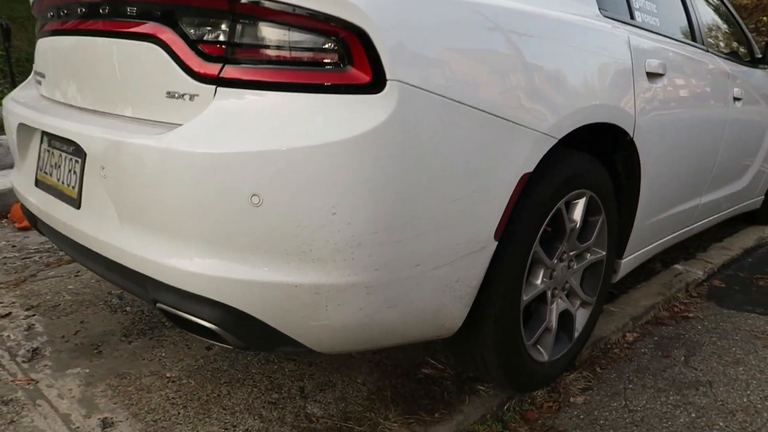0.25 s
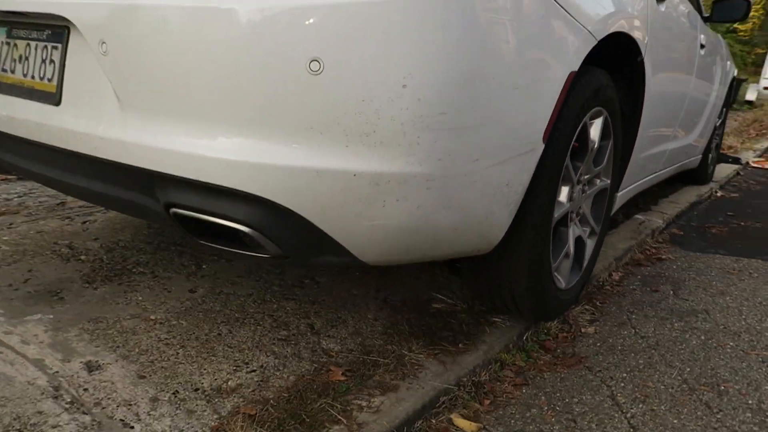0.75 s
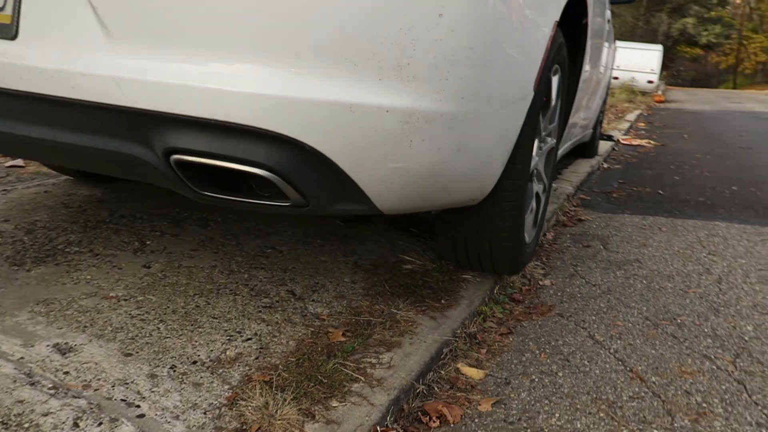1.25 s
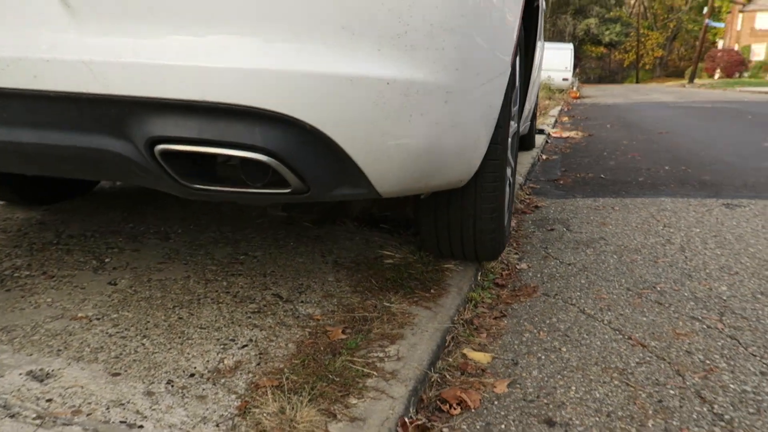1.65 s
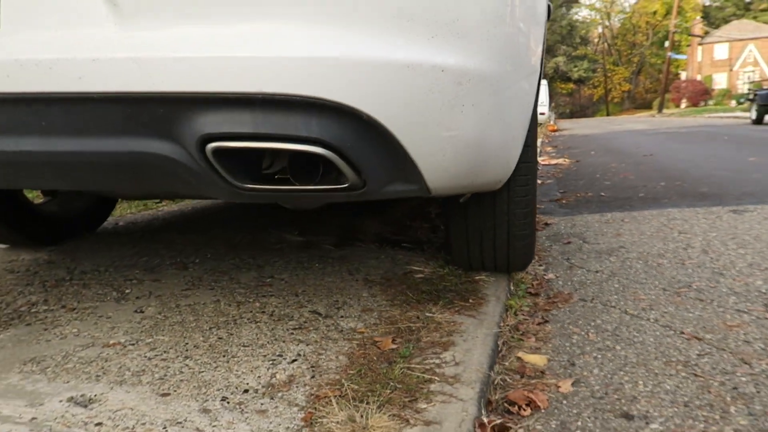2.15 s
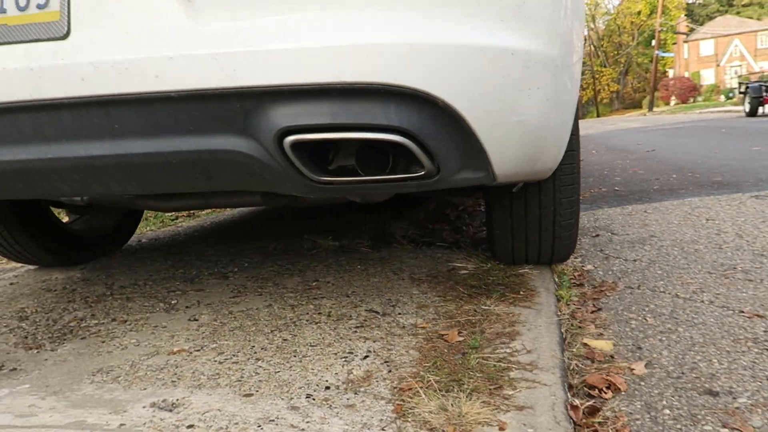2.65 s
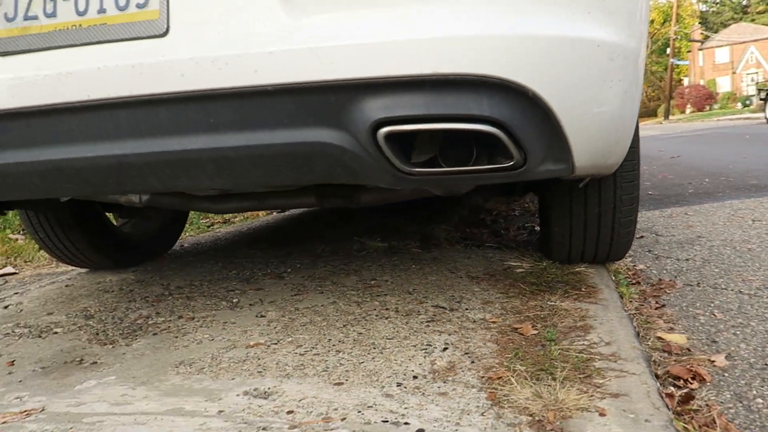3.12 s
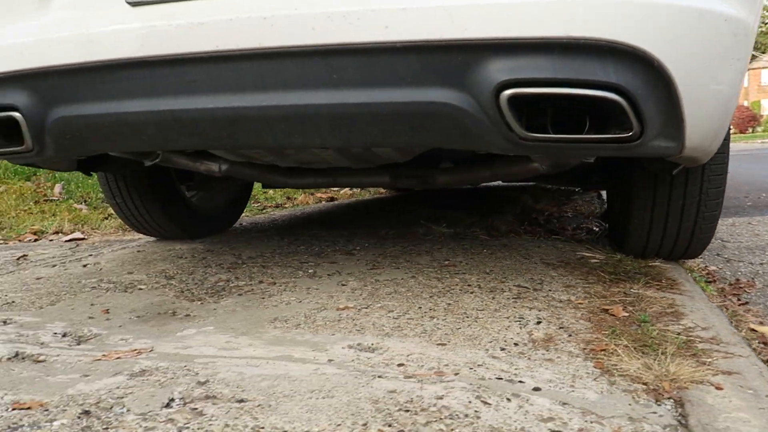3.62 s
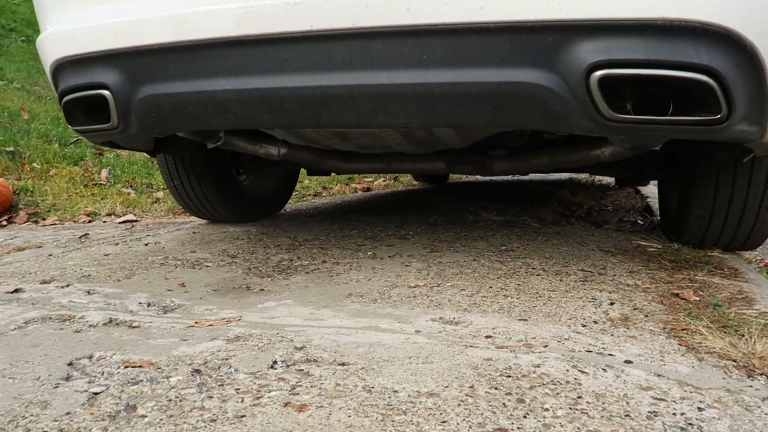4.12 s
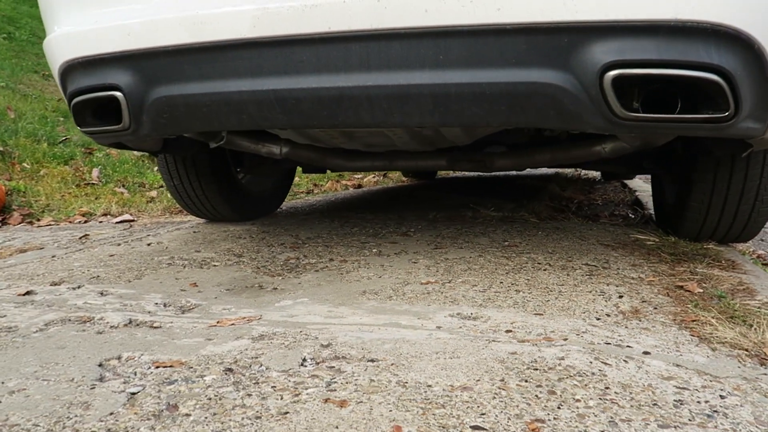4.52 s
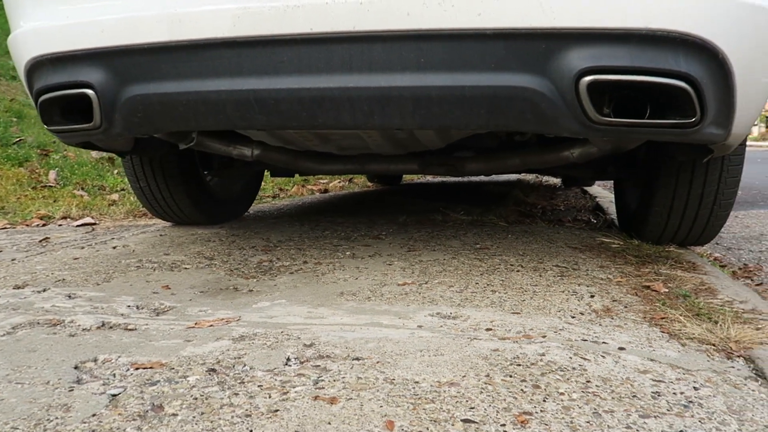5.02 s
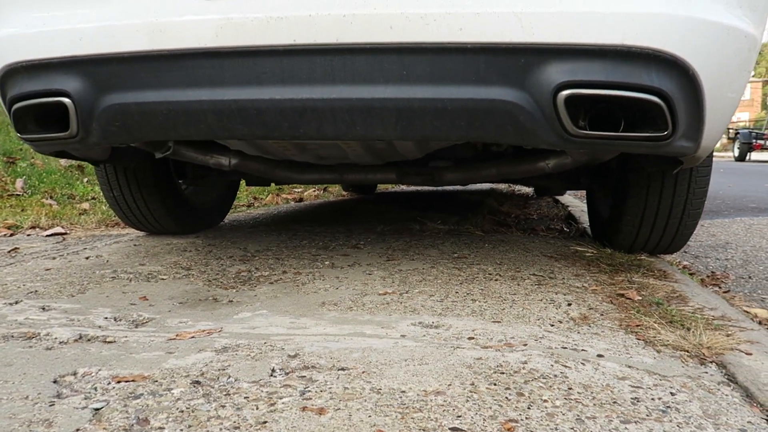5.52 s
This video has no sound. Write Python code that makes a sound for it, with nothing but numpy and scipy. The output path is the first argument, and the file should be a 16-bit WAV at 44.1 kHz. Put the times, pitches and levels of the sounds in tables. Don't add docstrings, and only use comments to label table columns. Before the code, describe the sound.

Close outdoor exhaust sound: throaty revs swell and sink over a rumbling drone, with gassy roar, hiss and faint handling noise.

```python
import sys
import numpy as np
from scipy import signal
from scipy.fft import rfft, irfft
from scipy.io import wavfile
from scipy.ndimage import uniform_filter1d

SR = 44100
rng = np.random.default_rng(int(sys.argv[2]) if len(sys.argv) > 2 else 0)


def ratio_of_db(decibels):
    return 10 ** (np.asarray(decibels, float) / 20)


def generate_wav(signal):
    frames = np.transpose(np.atleast_2d(signal))
    scaled = np.clip(frames, -1, 1) * 32767
    pcm = np.round(scaled).astype(np.int16)
    wavfile.write(sys.argv[1], SR, pcm)


N = 254456
T = np.arange(N) / SR

# f/Hz, density/dB
AIR_COLOUR = [(12, -29.5), (20, -7.5), (28, -4.5), (38, -9), (48, 1.5), (60, -10.5), (90, -38.5),
              (200, -100)]
# t/s, length/s, level/dB
GUSTS = [(.5, 0.098, -46), (1.28, 0.024, -44), (2.3, 0.26, -39.5), (2.86, 0.069, -46), (4.35, 0.1, -46),
         (5.75, 0.037, -32)]
# t/s, length/s, level/dB
SCUFFS = [
    (.84, 0.025, -66),
    (1.3, 0.057, -55.5),
    (4.19, 0.024, -70.5),
    (4.43, 0.039, -55.5),
]
# t/s, length/s, level/dB
TICKS = [
    (.004, .005, -53),
    (4.19, .02, -80),
]
# f/Hz, level/dB
HUMS = [(1061, -64.5), (1152, -70), (2379, -77), (3241, -78.5), (3515, -77), (4285, -81.5), (4635, -84.5),
        (5367, -80.5)]
# start/s, end/s, start f/Hz, end f/Hz, level/dB
WHISTLES = [(.36, .45, 815, 850, -45), (.33, .44, 1110, 1130, -55), (1.76, 1.88, 1290, 1270, -55),
            (1.4, 1.5, 990, 980, -54), (2.28, 2.48, 1160, 1140, -54), (3.45, 3.65, 1180, 1150, -57),
            (3.88, 4.25, 434, 428, -41), (5.1, 5.45, 426, 420, -47), (1.9, 2.08, 3250, 3220, -68)]
# f/Hz, likeness (1 = same)
LIKENESS = [(30, 0.84), (600, 1), (1200, 1), (2500, 1), (4500, 0.99), (7000, 0.71), (9000, 0.27),
            (13000, .3)]
# f/Hz, left over right/dB
LEFT_LEAN = [(60, -0.5), (110, -0.5), (190, 0.5), (350, 3.0), (630, 1.0), (1140, 0.0), (2050, 0.0),
             (3690, 0.0), (6640, 0.5), (12000, 0.0)]
# f/Hz, left ahead/rad
LEFT_LEAD = [(0, 0), (340, 0.3), (950, -0.0), (5600, 0.1), (7920, 0.7), (9220, 0.6), (9910, 0.2),
             (12100, 0.1)]
# f/Hz, density/dB
ROAR_COLOUR = [(350, -27.5), (600, 2.5), (739, -5.5), (825, -1.5), (911, -13.5), (960, -14.5),
               (1230, -10.5), (1640, -20.5), (2400, -31), (3120, -49), (5280, -120)]
HISS_COLOUR = [(940, -32.5), (1600, -3.5), (2110, -3), (2340, -2), (2830, -3), (3130, -4), (3360, -4.5),
               (4080, -6.5), (4800, -5.5), (5220, -7.5), (5870, -13.5), (7500, -18.5), (9750, -38.5),
               (16500, -120)]
FIZZ_COLOUR = [(3820, -26), (6500, -4), (7320, -4.5), (8660, -9), (11600, -8.5), (12400, -19),
               (16100, -49.5), (22000, -120)]
# f/Hz, width/Hz, level/dB
TIP_MODES = [(462, 13, 17), (530, 22, 8), (807, 10, -2), (1244, 59, 1.5), (1495, 100, -8),
             (2390, 54, -12.5), (3125, 57, -7.5), (2960, 25, -8), (4930, 120, -18)]
# t/s, level/dB
FLOW = [(0, -4), (.29, -2.5), (.45, 2), (.56, -1.5), (.8, -7), (1.12, -6.5), (1.3, -0.5), (1.45, -2),
        (1.8, 1.5), (2.4, 3.5), (2.62, -3.5), (2.75, .6), (3.23, -1.5), (4.18, 4.5), (4.5, -5),
        (4.81, -5.5), (5.5, -0.4), (5.77, 3)]
# t/s, firings per second/Hz
SPEED = [(0.0, 72.1), (0.21, 66.7), (0.38, 67.7), (0.62, 98.4), (0.85, 81.3), (1.11, 77.5), (1.23, 87.3),
         (1.42, 129.6), (1.52, 137.3), (1.84, 124.8), (2.23, 100.2), (2.69, 94.2), (2.99, 98.4),
         (4.09, 70.7), (4.46, 96.3), (4.74, 85.3), (5.35, 73.2), (5.77, 87.2)]
# t/s, firing strength/dB, rasp in the pipe/dB, unevenness of firings/dB
LOAD = [(0, -3, -2, -0.5), (.28, 1.5, 2.5, 2.5), (.47, 1.5, 3.5, 10), (.64, 1.5, 4, 2.5), (.8, -5, -4.5, 5),
        (1.08, -3.5, -9, -13), (1.25, 2, 8, 5), (1.4, 6.5, 13.5, 5), (1.68, -4.5, 0.5, -1), (1.9, 5, 6, 6),
        (2.2, -8.5, 7.5, 13), (2.42, 0, 5, 9.5), (3.45, 1.5, -3, -10), (3.95, 1, 1.5, 6.5),
        (4.25, 4, 5, 10), (4.65, -3, -3, -3.5), (5.38, -10.5, -1.5, -0.5), (5.62, 3.5, 3.5, 5)]
# t/s, length/s, extra rasp/dB
BARKS = [
    (.595, .06, 9.5),
    (1.309, .035, 10.5),
    (4.4, 0.061, 5.5),
]
# f/Hz, width/Hz, level/dB
PIPE_MODES = [(90.7, 10.7, -6.5), (153.5, 10.97, 2.5), (204.1, 10.7, -4.5), (267.2, 16, -18),
              (317.2, 12, -13.5), (375.1, 12, -15.5), (432.1, 16.4, -15.5), (506.6, 25, -22.5),
              (554, 27, -23.5), (615, 28, -32), (691, 19, -33.5), (838.6, 15, -42.5), (916, 97, -43.5),
              (1020, 150, -45), (1470, 300, -63)]
# f/Hz, level/dB
SILENCER_PASS = [(66, -36), (73, -22.5), (81.5, -21), (86, -12.5), (99, -11), (107, -19), (117, -33.5),
                 (135, -36.5),
                 (141, -31), (147, -15), (155, -15), (168, -22), (188, -25), (201, -23), (215, -36), (235, -52),
                 (258, -44), (288, -41.5), (305, -47), (325, -42), (360, -48.5), (400, -46), (450, -62),
             (520, -49)]
ORDER_LAGS = [0, -1.7, -5.3, 1.6]
STEEP_DB = [-1, -12]
# t/s, length/s, extra level/dB
STEEP_SWELLS = [(.66, .05, 5), (2.42, .07, 3.5), (2.9, 0.085, 0), (3.24, 0.07, -9), (3.44, 0.063, 5),
                (4.7, 0.085, 13), (4.4, 0.038, -11)]
# t/s, length/s, change/dB
SECOND_LIFTS = [
    (.48, 0.038, 6),
    (.78, .05, -2.5),
    (3.2, 0.17, -2),
    (4.06, 0.039, -11.5),
    (4.2, 0.044, -2),
    (5.26, .07, 5),
    (5.4, .04, -3.5),
    (5.64, 0.024, -6.5),
]
# t/s, length/s, depth/dB
STUMBLES = [(.86, .025, -2), (2.28, 0.03, -2), (2.64, .05, -10), (4.06, 0.084, -12), (4.62, 0.016, -3.5)]
# t/s, length/s, extra unevenness/dB, second mode over first/dB
SHUDDERS = [(.01, 0.035, 5, 12), (.92, 0.052, 9.5, -17.5), (1.36, 0.026, 7.5, 14.5), (1.6, 0.043, 8, 0),
            (1.8, 0.033, 6, -6), (2.13, 0.05, 3, 6), (2.23, 0.034, 4.5, -7.5)]
# t/s, length/s, level/dB
WHINE = [(1.95, .13, -40), (3.54, .17, -44), (3.85, .08, -47)]


def evened(x):
    return x / np.sqrt(np.mean(x ** 2) + 1e-20)


def steady(x, seconds):
    size = round(seconds * SR)
    power = uniform_filter1d(uniform_filter1d(x ** 2, size), size)
    return x / np.sqrt(power + 1e-12)


def read(points, hz):
    f, value = np.transpose(points)
    return np.interp(np.log(hz + 1), np.log(f + 1), value)


def columns(rows):
    s, *values = np.transpose(rows)
    return [np.interp(T, s, v) for v in values]


def swells(rows):
    return sum(np.array(extra)[:, None] * np.exp(-((T - s) / length) ** 2) for s, length, *extra in rows)


def bumps(rows):
    return sum(ratio_of_db(db) * np.exp(-((T - s) / length) ** 2) for s, length, db in rows)


def band(x, lo_hz, hi_hz):
    return signal.sosfilt(signal.butter(3, [lo_hz, hi_hz], "bandpass", fs=SR, output="sos"), x)


def filtered(x, response):
    both = np.concatenate([x, x[::-1]])
    hz = np.fft.rfftfreq(2 * N, 1 / SR)
    return irfft(rfft(both) * response(hz), 2 * N)[..., :N]


def pipe(hz, modes):
    total = 0
    for k, (f, width, db) in enumerate(modes):
        push = 1j * hz * width
        total = total + (-1) ** k * ratio_of_db(db) * push / (f ** 2 - hz ** 2 + push)
    return total


def microphone_air():
    colour = ratio_of_db(read(AIR_COLOUR, np.fft.rfftfreq(N, 1 / SR)))
    low = evened(irfft(rfft(rng.standard_normal(N)) * colour, N))
    return low * (ratio_of_db(-50) + bumps(GUSTS))


def grip_scuffs():
    rub = band(rng.standard_normal((2, N)), 150, 9000)
    return evened(signal.lfilter([1], [1, -.93], rub)) * bumps(SCUFFS)


def grip_ticks():
    bright = evened(band(rng.standard_normal(N), 4000, 14000))
    return bright * bumps(TICKS) * ratio_of_db(np.array([[-2.], [1.]]))


def kerb(x):
    t, fade_s = np.arange(6000) / SR, 0.15
    hits = rng.standard_normal((2, len(t))) * (rng.random((2, len(t))) < .03)
    taps = hits * ratio_of_db(-60 * t / fade_s)
    taps = taps / np.linalg.norm(taps[0])
    return ratio_of_db(-13) * signal.fftconvolve(band(x, 240, 2400)[None], taps, axes=1)[:, :N]


def hums():
    out = np.zeros(N)
    for hz, db in HUMS:
        level, pitch = evened(uniform_filter1d(rng.standard_normal((2, N)), size=5000))
        out += ratio_of_db(db + 0.63 * level) * np.sin(2 * np.pi * np.cumsum(hz + 7.4 * pitch) / SR)
    return out


def whistles():
    out = np.zeros(N)
    for start, end, from_hz, to_hz, db in WHISTLES:
        u = np.clip((T - start) / (end - start), 0, 1)
        hz = from_hz + (to_hz - from_hz) * u
        out += ratio_of_db(db) * np.sin(np.pi * u) ** 1.2 * np.sin(2 * np.pi * np.cumsum(hz) / SR)
    return out


def speed():
    size = round(.09 * SR)
    once = uniform_filter1d(columns(SPEED)[0], size, mode="nearest")
    return uniform_filter1d(once, size, mode="nearest")


def bark():
    return swells(BARKS)[0]


def load():
    strength_db, rasp_db, uneven_db = uniform_filter1d(columns(LOAD), size=1300, axis=1)
    return strength_db, rasp_db + bark(), uneven_db


def gas_noise(colour, patchy_db, streaky_db):
    hz = np.fft.rfftfreq(1024, 1 / SR)
    a, b, c, d, patches, streaks = rng.standard_normal((N // 256 + 5, 513, 6)).T
    patches = uniform_filter1d(patches, size=8, axis=0)
    patches = evened(uniform_filter1d(patches, size=12, axis=1))
    streaks = evened(uniform_filter1d(streaks, size=70, axis=1))
    same = np.clip(read(LIKENESS, hz), -1, 1)[:, None]
    left = a + 1j * b
    right = same * left + np.sqrt(1 - same ** 2) * (c + 1j * d)
    level_db = read(colour, hz)[:, None] + patchy_db * patches + streaky_db * streaks
    z = np.array([left, right]) * ratio_of_db(level_db)
    return evened(signal.istft(z, nperseg=1024, noverlap=768)[1][:, :N])


def outlet_gas(turns):
    flow_db = uniform_filter1d(columns(FLOW)[0], size=1200)
    roar_db = -54 + 0.52 * load()[1] + 0.24 * flow_db
    hiss_db = -57.5 + flow_db
    fizz_db = -75.5 + 0.9 * flow_db
    throb = 1 + 0.13 * np.cos(2 * np.pi * turns + 0.5)
    puffs = 0.32 * bark() * abs(np.cos(np.pi * turns)) ** 6.4
    roar = ratio_of_db(roar_db) * gas_noise(ROAR_COLOUR, patchy_db=3.7, streaky_db=2.0) * (throb + puffs)
    hiss = ratio_of_db(hiss_db) * gas_noise(HISS_COLOUR, patchy_db=1.2, streaky_db=4.0) * (0.68 + 0.27 * throb)
    fizz = ratio_of_db(fizz_db) * gas_noise(FIZZ_COLOUR, patchy_db=1.2, streaky_db=1.5)
    singing = evened(filtered(rng.standard_normal(N), lambda hz: pipe(hz, TIP_MODES)))
    return roar + hiss + fizz + ratio_of_db(hiss_db + 8) * singing


def belt_whine(turns):
    return bumps(WHINE) * np.sin(2 * np.pi * 7 * turns)


def gruff_gas(turns):
    puffs = (1.1 + np.exp(-(turns % 1) / 0.09)) * rng.standard_normal(N)
    gruff = band(filtered(puffs, lambda hz: pipe(hz, PIPE_MODES[3:])), 180, 3600)
    return ratio_of_db(-44 + load()[1] - 0.35 * bark()) * steady(gruff, 0.1)


def uneven_rumble(turns):
    uneven_db = load()[2]
    shudder_db, tilt_db = swells(SHUDDERS)
    kicks = np.diff(np.floor(turns), prepend=0) * rng.standard_normal(N)
    first = steady(band(filtered(kicks, lambda hz: pipe(hz, PIPE_MODES[:1])), 80, 110), .05)
    second = steady(band(filtered(kicks, lambda hz: pipe(hz, PIPE_MODES[1:3])), 140, 212), .04)
    tilt = ratio_of_db((-0.4 + 0.067 * uneven_db + tilt_db) / 2)
    return 0.57 * ratio_of_db(-31 + uneven_db + shudder_db) * (first / tilt + second * tilt)


def firing_lines(turns, rate_hz):
    _, rasp_db, uneven_db = load()
    bank_db = -28 + 0.57 * uneven_db + 0.5 * swells(SHUDDERS)[0]
    sharp_db = -22.5 + rasp_db + 0.5 * bark()
    slow, out = T[::256], 0
    for half in [1, 3, 5, 7, *range(9, 40)]:
        hz = half / 2 * rate_hz[::256]
        drift = evened(uniform_filter1d(rng.standard_normal(len(slow)), size=15))
        if half % 2:
            level_db = bank_db[::256] - 12.0 * (half > 8) - 3.5 * (half < 2)
        else:
            level_db = sharp_db[::256]
        start = np.exp(1j * rng.uniform(-.6, .6))
        gain = pipe(hz, PIPE_MODES) * ratio_of_db(level_db + 2.5 * drift) * start
        out = out + (np.interp(T[::4], slow, gain) * np.exp(1j * np.pi * half * turns[::4])).real
    return signal.resample_poly(out, 4, 1)[:N]


def boom_levels(rate_hz):
    strength_db, rasp_db, _ = load()
    climb = np.gradient(rate_hz) * SR
    cold_hz = rate_hz * (1 - 0.022 * np.tanh(climb / 15))
    silencer = SILENCER_PASS
    first = read(silencer, rate_hz) + strength_db
    second = read(silencer, 2 * cold_hz) + strength_db + swells(SECOND_LIFTS)[0]
    upper = []
    for k, steep_db in zip([3, 4], STEEP_DB):
        own_db = read(silencer, k * cold_hz) + strength_db + 0.31 * rasp_db
        grown_db = steep_db + 3.0 * first + swells(STEEP_SWELLS)[0]
        upper.append(10 * np.log10(ratio_of_db(2 * own_db) + ratio_of_db(2 * grown_db)))
    return [first, second, upper[0], upper[1] + bark()]


def boom(turns, rate_hz):
    out = 0
    for k, db in enumerate(boom_levels(rate_hz)):
        delay = np.unwrap(np.angle(pipe((k + 1) * rate_hz[::256], PIPE_MODES)))
        phase = 2 * np.pi * (k + 1) * turns + ORDER_LAGS[k] + np.interp(T, T[::256], delay)
        out = out + ratio_of_db(db + 0.53 * (k == 2)) * np.cos(phase)
    return np.sqrt(2) * out * (1 - bumps(STUMBLES))


def exhaust(turns, rate_hz):
    rough = gruff_gas(turns) + uneven_rumble(turns)
    return belt_whine(turns) + rough + firing_lines(turns, rate_hz) + boom(turns, rate_hz)


def scene():
    rate_hz = speed()
    turns = np.cumsum(rate_hz) / SR
    background = microphone_air() + grip_scuffs() + grip_ticks()
    car = hums() + whistles() + exhaust(turns, rate_hz)
    ports = np.array([[.5], [-.5]])
    direct = filtered(car, lambda hz: ratio_of_db(ports * read(LEFT_LEAN, hz)) * np.exp(1j * ports * read(LEFT_LEAD, hz)))
    return background + kerb(car) + outlet_gas(turns) + direct


def top_cut(x):
    return signal.sosfilt(signal.butter(12, 12560, fs=SR, output="sos"), x)


def record(dry):
    edge_s = np.minimum(T, T[-1] - T)
    fade = np.sin(np.pi / 2 * np.clip(edge_s / .004, 0, 1))
    return top_cut(dry * fade)


dry = scene()
out = record(dry)
generate_wav(out)
```